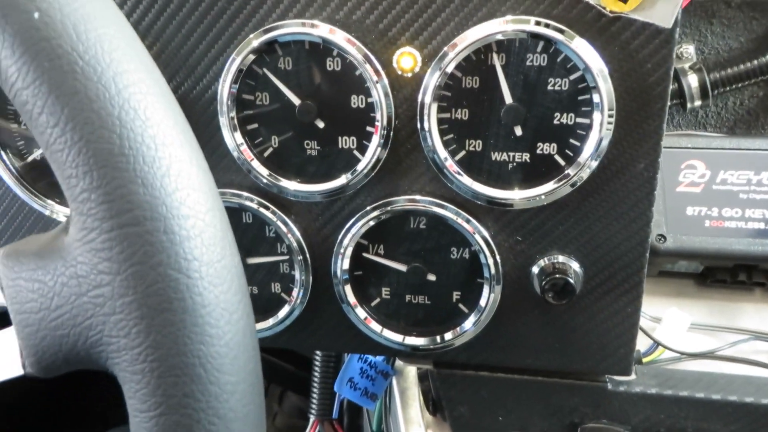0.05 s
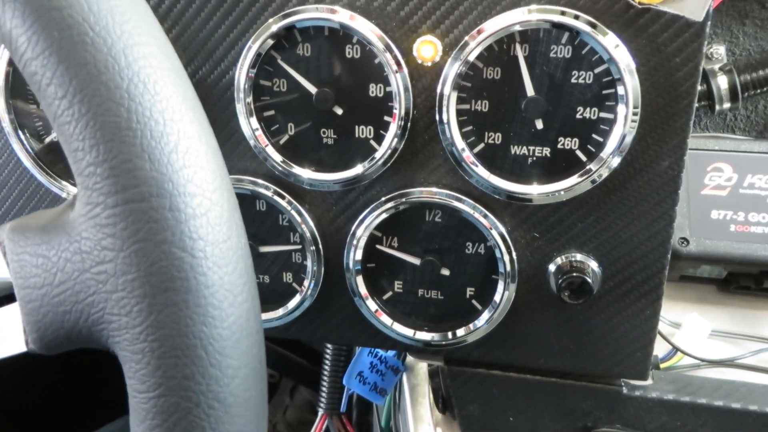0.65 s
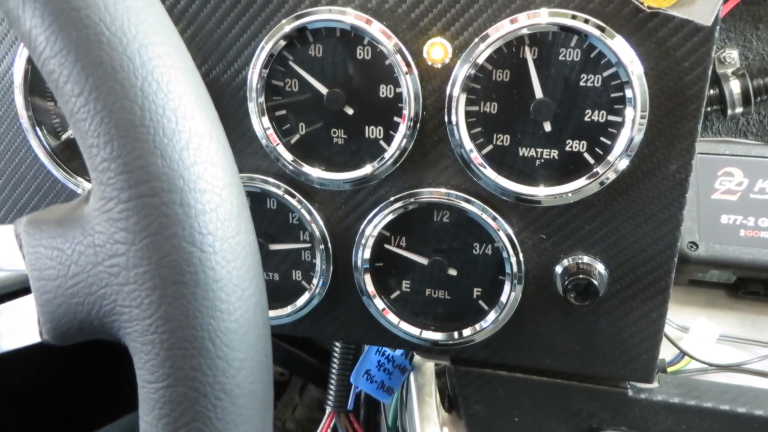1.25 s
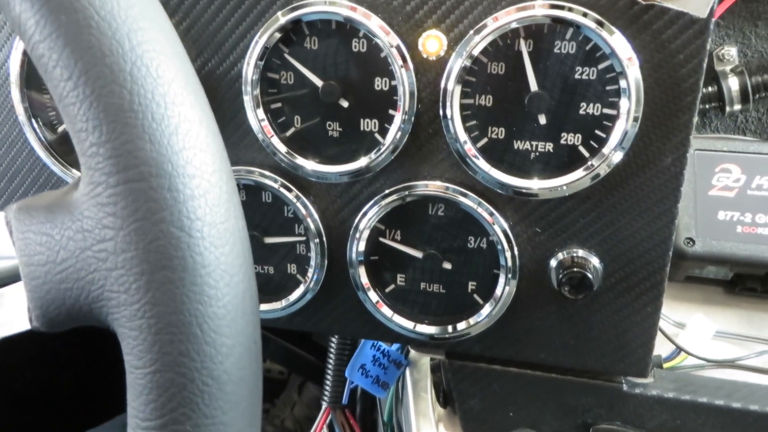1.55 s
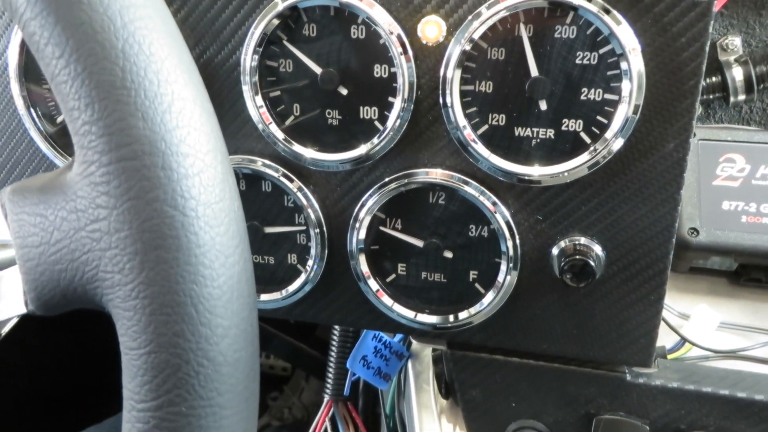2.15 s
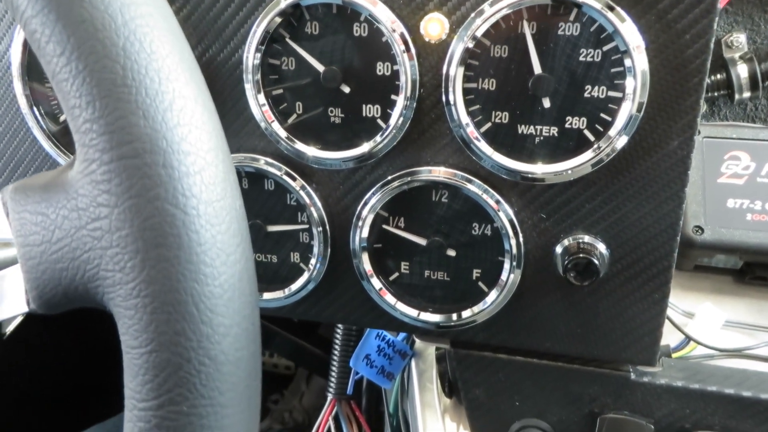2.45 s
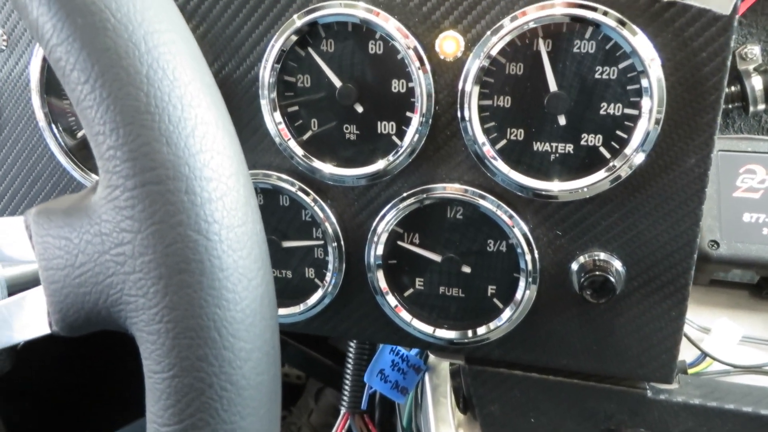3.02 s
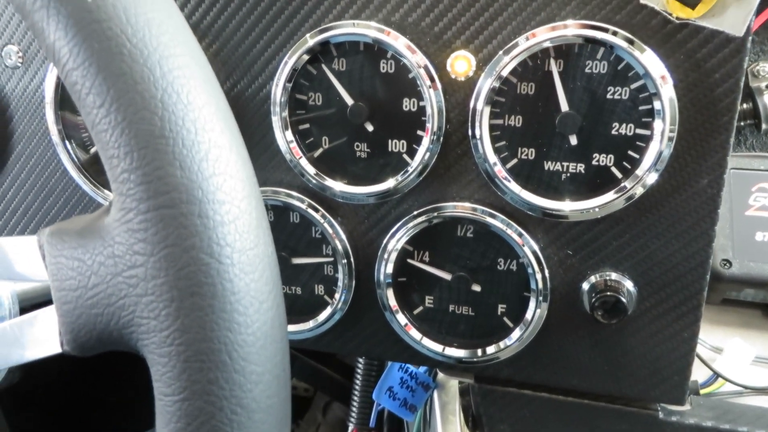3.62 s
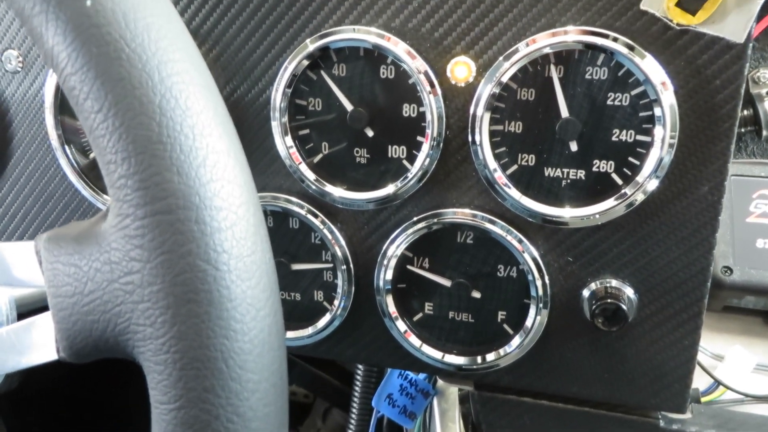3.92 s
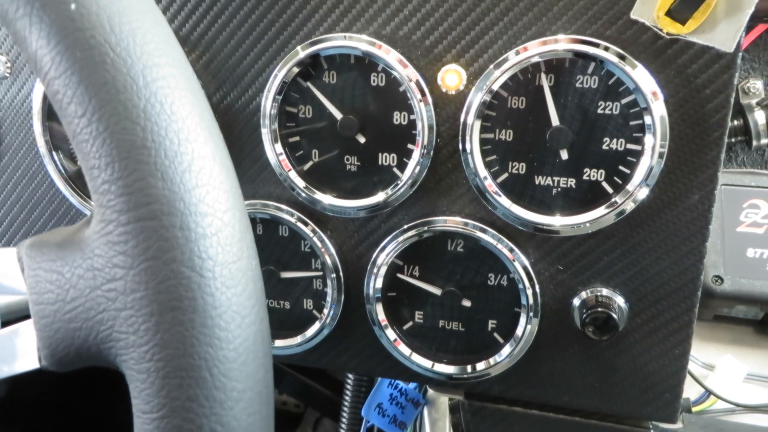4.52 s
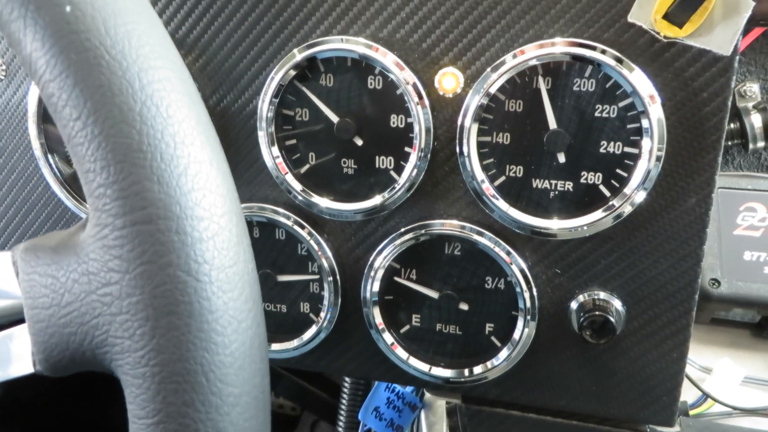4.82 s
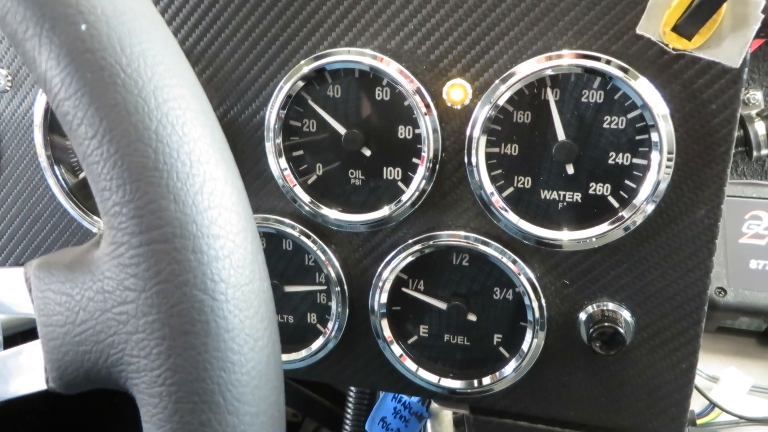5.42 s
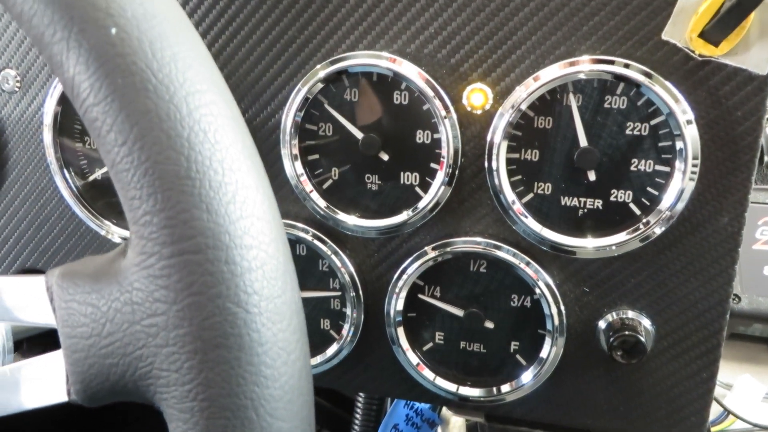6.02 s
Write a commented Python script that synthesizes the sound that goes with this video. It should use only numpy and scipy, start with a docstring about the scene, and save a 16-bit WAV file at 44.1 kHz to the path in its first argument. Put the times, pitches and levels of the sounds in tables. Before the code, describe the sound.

A V8 car engine idles in a garage with a low, lumpy burble, a steady fan whine and engine bay hiss. One sharp throttle blip brings a fizz of intake air, small metal rattles, exhaust barks and a buzzing loose panel. The revs are then held a little above idle while the cabin booms, before sinking back to the uneven idle. The microphone is inside, at the driver's seat.

```python
"""In a garage, heard from the driver's seat, a V8 idles with a lumpy burble.
The throttle is blipped, then held while the cabin booms, and the engine sinks back to idle.
Periodic firings give a harmonic hum; their inequality excites the resonances of pipe and cabin.
A fan whines and panels drone in the hiss of the engine bay; all sink away while the exhaust is loud.
The blip brings a fizz of intake air, metal rattles, exhaust barks and the buzz of a loose panel."""
import sys
import numpy as np
from scipy import signal
from scipy.fft import rfft, irfft
from scipy.io import wavfile
from scipy.ndimage import uniform_filter1d, minimum_filter1d

SR = 44100
rng = np.random.default_rng(int(sys.argv[2]) if len(sys.argv) > 2 else 0)


def to_wav(s):
    """Save 16-bit WAV."""
    ch = np.atleast_2d(s).T  # columns
    pcm = np.round(np.clip(ch, -1, 1) * 32767)  # PCM
    wavfile.write(sys.argv[1], SR, pcm.astype(np.int16))


N = 276066
TIME = np.arange(N) / SR


def amp(db):
    """Amplitude ratio of a level in decibels."""
    return 10 ** (np.asarray(db) / 20)


def unit(x):
    """Normalisation to rms 1."""
    return x / np.sqrt(np.mean(x ** 2) + 1e-20)


def by_time(rows):
    """Linear interpolation of a time table at every sample."""
    return np.interp(TIME, *np.transpose(rows))


def by_frequency(rows, hz):
    """Interpolation of a spectrum on a logarithmic frequency axis."""
    f, value = np.transpose(rows)
    return np.interp(np.log(hz + 1), np.log(f), value)


def colour(x, spectrum):
    """Minimum-phase filtering: the phase is the Hilbert transform of the log gain."""
    hz = abs(np.fft.fftfreq(2 ** 14, 1 / SR))
    log_gain = np.log(amp(by_frequency(spectrum, hz)))
    response = np.exp(signal.hilbert(log_gain).conj())
    taps = np.fft.ifft(response).real[:2 ** 13]
    return signal.oaconvolve(x, taps)[:N]


def resonate(x, hz, width):
    """Second-order resonance of peak gain 1 and Q = hz / width."""
    return signal.lfilter(*signal.iirpeak(hz, hz / width, SR), x)


def wander(hz):
    """Random modulation: low-pass Gaussian noise of rms 1."""
    lowpass = np.exp(-(np.fft.rfftfreq(N, 1 / SR) / hz) ** 2)
    return unit(irfft(rfft(rng.standard_normal(N)) * lowpass, N))


def puffs(cycles, length):
    """Exponential relaxation restarted each cycle; length is its time constant in cycles."""
    return unit(np.exp(-(cycles % 1) / length))


def swell(start, end, rise, fall):
    """Exponential growth up to start, a plateau until end, then exponential decay."""
    return np.exp(np.minimum(TIME - start, 0) / rise - np.maximum(TIME - end, 0) / fall)


def stroke(start, end, db, sag, rise, fall):
    """A swell whose plateau decays by sag decibels a second."""
    return amp(db - sag * np.clip(TIME - start, 0, end - start)) * swell(start, end, rise, fall)


# engine speed as firing rate: t/s, f/Hz
FIRING_RATE = [(0.0, 58.99), (0.45, 54.76), (1.27, 48.57), (1.75, 47.57), (2.0, 50.01), (2.2, 50.66),
               (2.43, 77.22), (2.6, 100.93), (2.82, 99.73), (2.95, 87.14), (3.17, 71.7), (3.37, 74.44),
               (3.95, 74.17), (4.16, 57.68), (4.31, 60.0), (5.54, 51.97), (5.84, 47.34), (6.26, 48.52)]

def firing_count():
    """Phase is the integral of frequency: firings so far, four to a crankshaft turn."""
    return np.cumsum(by_time(FIRING_RATE)) / SR


def by_speed(rows, column=1):
    """Interpolation of a table at the instantaneous firing rate."""
    columns = np.transpose(rows)
    return np.interp(by_time(FIRING_RATE), columns[0], columns[column])


# cylinders in firing order: bank (+1 near, -1 far), relative level/dB
FIRING_ORDER = [(1, 5.5), (-1, 13), (1, 2.5), (1, 6), (-1, 4), (1, 2.5), (-1, 5), (-1, 10.5)]

def firing_pulses(firings, bank_share, rough):
    """Two impulse trains: one weighted by cylinder, bank and chance, one uniform."""
    at = np.flatnonzero(np.diff(np.floor(firings)) > 0)
    bank, db = np.transpose(FIRING_ORDER)[:, np.arange(len(at)) % len(FIRING_ORDER)]
    size = amp(db) * (1 + bank_share * np.sign(bank))
    uneven, even = np.zeros((2, N))
    uneven[at] = size / size.mean() + rough * rng.standard_normal(len(at))
    even[at] = 1
    return uneven, even


# round trips between floor, body and garage walls: delay/s, reflection coefficient (capped below)
ROUND_TRIPS = [(.0047, 1), (0.011, 1), (0.0194, 0.33)]

def scatter(x):
    """Multiple reflection as all-pass filtering: pulses spread in time without being coloured."""
    spectrum, hz = rfft(x, 2 * N), np.fft.rfftfreq(2 * N, 1 / SR)
    for delay, reflection in ROUND_TRIPS:
        trip = np.exp(-2j * np.pi * hz * delay)
        reflection = np.clip(reflection, 0, .8)
        spectrum = spectrum * (reflection + trip) / (1 + reflection * trip)
    return irfft(spectrum)[:N]


# envelope of the limping exhaust beat: t/s, level/dB
BURBLE_LEVEL = [(0, -23.5), (.4, -16), (1.15, -19), (2.1, -21), (2.27, -10), (2.33, -14.5), (2.5, -15.5),
                (2.85, -12.5), (2.98, -20), (3.32, -19.5), (3.65, -28), (3.95, -23.5), (4.15, -22.5),
                (4.35, -16.5), (5.0, -12), (5.38, -22.5), (6.26, -24.5)]
# response of the exhaust pipe, heard in the cabin: f/Hz, gain/dB
PIPE_RESPONSE = [(20, -86.5), (33, -49), (44, -7.5), (68, -17), (95, -13), (135, -3.5), (175, -7),
                 (200, -11.5), (230, -11.5), (270, -17.5), (295, -29.5), (400, -28.5), (500, -35.5),
                 (1500, -78)]
# air modes of the cabin: f/Hz, bandwidth/Hz, gain/dB
CABIN_MODES = [(134, 6.2, 0), (148.55, 7.1, 11.5), (169, 8.2, 6.5), (206, 7.8, 2), (221, 10, 2.5),
               (269.1, 11.2, 7.5), (331.5, 10, 6)]

def burble(firings, even_share=0.11, gas_db=-19, bite=0.33, bite_hz=240, neutral_load_db=-42):
    """Subharmonic excitation: unequal firings repeat every eight pulses and ring pipe and cabin."""
    uneven, even = firing_pulses(firings, bank_share=.75, rough=.17)
    limp = unit(uneven - (1 - even_share) * even)
    gas = puffs(firings, length=0.94) * rng.standard_normal(N)
    pipe = colour(scatter(limp + amp(gas_db) * gas), PIPE_RESPONSE)
    # load sharpens the pulses, which lifts their upper partials
    load_gain, _ = load()
    upper = signal.sosfiltfilt(signal.butter(4, bite_hz, "high", fs=SR, output="sos"), pipe)
    pipe = pipe + upper * ((load_gain / amp(neutral_load_db)) ** bite - 1)
    cabin = pipe + sum(amp(db) * resonate(pipe, hz, width) for hz, width, db in CABIN_MODES)
    # the envelope alone sets the level, whichever mode the pulses hit
    running_rms = np.sqrt(uniform_filter1d(cabin ** 2, size=2800) + 1e-12)
    return amp(by_time(BURBLE_LEVEL) - 0.08) * cabin / running_rms


# envelope of the firing fundamental: t/s, level/dB
HUM_LEVEL = [(0, -32), (1.0, -24), (1.7, -21.5), (2.0, -25.5), (2.25, -18.5), (2.7, -19.5), (2.85, -27),
             (3.0, -22), (3.33, -23.5), (3.8, -31.5), (4.0, -47), (4.33, -27.5), (5.25, -36), (5.85, -26),
             (6.26, -28.5)]
# harmonics the cabin favours: firing f/Hz, second/dB re fundamental, third/dB re burble
HUM_OVERTONES = [(46.9, 0, -14.5), (49.4, 1, 4), (51.8, 3, -12), (59.5, 7.5, -7), (58.4, 0, -2),
                 (67, 4, -19), (75, 2, -11), (84.4, 8, -25.5), (100, -10.5, -23)]

def hum(firings, waver_db=2.5, boom_start=3.31, boom_end=3.96, boom_db=-8, boom_sag_db_per_s=9.5):
    """Harmonic series of the push all firings share; for a spell the second booms in the cabin."""
    first = by_time(HUM_LEVEL)
    second = first + by_speed(HUM_OVERTONES)
    third = by_time(BURBLE_LEVEL) + by_speed(HUM_OVERTONES, column=2)
    phase = 2 * np.pi * firings + np.pi / 2
    tones = sum(amp(db + 0.2 + waver_db * wander(hz=19.6)) * np.sin(k * phase)
                for k, db in enumerate([first, second, third], 1))
    held = swell(boom_start, boom_end, rise=0.018, fall=0.027)
    sag_db = boom_sag_db_per_s * np.maximum(TIME - boom_start, 0)
    boom = amp(boom_db - sag_db - 0.4 * wander(hz=12))
    return np.sqrt(2) * (tones + held * (boom - amp(second)) * np.sin(2 * phase))


# rasp with the throttle shut: firing f/Hz, level/dB
COASTING_RASP = [(47, -84), (53, -44.5), (60, -45.5), (100, -36.5)]
# throttle presses: start t/s, end t/s, level/dB, sag/(dB/s), roughness (0-1)
THROTTLE_PRESSES = [(2.41, 2.79, -30.5, -1, 0.46), (3.425, 3.728, -23.5, 42, 0.32),
                    (4.328, 5.218, -36.5, 1, 0.45)]

def load(coasting_roughness=0.54):
    """Superposition of coasting and throttle: the rasp's amplitude and weighted mean roughness."""
    gain = amp(by_speed(COASTING_RASP))
    rough = coasting_roughness * gain
    for start, end, db, sag, roughness in THROTTLE_PRESSES:
        press = stroke(start, end, db, sag, rise=0.092, fall=0.084)
        gain = gain + press
        rough = rough + roughness * press
    return gain, np.clip(rough / gain, 0, 1)


# spectrum of the exhaust rasp: f/Hz, relative level/dB
RASP_SPECTRUM = [(100, -53.5), (220, 8.5), (290, 2), (375, 2), (450, -0.5), (520, -5), (580, -5.5),
                 (750, -19), (1200, -21), (2500, -51.5), (6000, -51)]

def rasp(firings, gas_db=-7, direct=0.2):
    """Pulse sharpening: under load, steep pulses and bursts of gas carry higher partials."""
    uneven, even = firing_pulses(firings, bank_share=0.44, rough=0.63)
    gain, rough = load()
    pulses = unit((1 - rough) * unit(even) + rough * unit(uneven - even))
    heard = unit(direct * pulses + (1 - direct) * scatter(pulses))
    gas = puffs(firings, length=0.1) * rng.standard_normal(N)
    return gain * unit(colour(heard + amp(gas_db) * gas, RASP_SPECTRUM))


# likeness of the noise at left and right: f/Hz, coherence
COHERENCE = [(50, .9995), (300, .96), (700, .88), (2500, .89), (4500, .72), (7000, .4), (9000, .25),
             (12500, .4)]
# phase of the left channel relative to the right: f/Hz, phase/rad
PHASE_LEAD = [(3000, 0), (5500, -.2), (8000, -.8), (10000, -2.4), (13000, -3.0)]

def stereo_noise(spectrum):
    """Partial coherence: noise at two points grows less alike as the wavelength shortens."""
    hz = np.fft.rfftfreq(N, 1 / SR)
    coherence = np.clip(by_frequency(COHERENCE, hz), -1, 1)
    shift = np.exp(-1j * by_frequency(PHASE_LEAD, hz))
    left, independent = rfft(rng.standard_normal((2, N))) * amp(by_frequency(spectrum, hz))
    right = coherence * left * shift + np.sqrt(1 - coherence ** 2) * independent
    pair = irfft(np.array([left, right]), N)
    return pair / np.std(pair.mean(0))


# common envelope of hiss, drone and whine: t/s, level/dB
BAY_LEVEL = [(0, -36.5), (1.15, -35), (2.13, -31.5), (2.27, -34.5), (2.33, -44), (2.85, -46.5), (3.3, -44),
             (3.5, -48.5), (3.87, -48.5), (4.37, -39.5), (5.13, -39), (6.26, -34.5)]
# spectral density of the hiss: f/Hz, relative level/dB
HISS_SPECTRUM = [(30, -34.5), (200, 16.5), (350, -7.5), (490, -6), (620, 0), (1000, -1.5), (1500, -0.5),
                 (2200, -2.5), (2800, -4.5), (3500, -5), (4400, -5.5), (5200, -9), (8000, -13.5),
                 (12000, -20.5), (14000, -45)]
# modes of panels and ducts: f/Hz, bandwidth/Hz, relative level/dB
PANEL_MODES = [(400.2, 10.5, -7.5), (376.5, 18.4, -9), (760, 23.3, -0.5), (808.5, 50, -3.5),
               (1147, 29, -6.5), (1206.5, 28, -8), (3350, 190, -11.5)]

def engine_bay(firings, hiss_db=7.5, drone_db=-1.23, whine_db=-3.5, pulsing=0.03, throb=0.08):
    """Broadband excitation: belts, valves and air hiss; airflow drives panel modes; the fan whines."""
    hiss = stereo_noise(HISS_SPECTRUM) * (1 - pulsing + pulsing * puffs(firings, length=0.52))
    hiss = hiss * amp(hiss_db + 0.47 * wander(hz=60)) * amp([[.2], [-.2]])
    air = rng.standard_normal(N)
    drone = sum(amp(db) * unit(resonate(resonate(air, hz, width), hz, width * 2))
                for hz, width, db in PANEL_MODES)
    drone = drone * (1 + throb * np.sin(np.pi * firings / 2))  # shaken once a crankshaft turn
    drone = drone * amp(drone_db + 1.3 * wander(hz=4)) * amp([[-1.1], [1.1]])
    return amp(by_time(BAY_LEVEL)) * (hiss + drone + amp(whine_db) * fan_whine())


# partials of the fan: harmonic number, relative level/dB
BLADE_HARMONICS = [(1, -12), (2, -13), (4, -6.5), (6, -17)]

def fan_whine(blade_hz=402.5, drift=0.00062, flutter_db=3.0):
    """Blade-passing tones of an electric fan, independent of engine speed."""
    passes = np.cumsum(blade_hz * (1 + drift * wander(hz=5))) / SR
    tones = sum(amp(db + flutter_db * wander(hz=23)) * np.sin(2 * np.pi * k * passes)
                for k, db in BLADE_HARMONICS)
    return np.sqrt(2) * tones


# spectral density of the first rush of air: f/Hz, relative level/dB
RUSH_SPECTRUM = [(300, 4), (800, 0), (3000, -22), (8000, -8), (12500, -7), (15500, -27)]
# spectral density of the intake fizz: f/Hz, relative level/dB
FIZZ_SPECTRUM = [(500, -25.5), (3000, -4.5), (5000, -7), (6700, 1), (8500, -1.5), (11500, -5), (14000, -25)]
# gulps of air: start t/s, end t/s, level/dB, sag/(dB/s)
AIR_GULPS = [(2.31, 2.685, -36.5, 21.5), (2.967, 3.068, -45.5, 3), (3.3, 3.375, -47.5, -1)]

def intake(flutter_db=1.5, rush_db=-37, rush_s=2.2, rush_width_s=.08):
    """Flow noise at the throttle plate: a rush as it cracks open, a bright fizz with each gulp."""
    flow = sum(stroke(*gulp, rise=0.12, fall=0.086) for gulp in AIR_GULPS)
    fizz = stereo_noise(FIZZ_SPECTRUM) * flow * amp(flutter_db * wander(hz=69))
    opening = np.exp(-((TIME - rush_s) / rush_width_s) ** 2 / 2)
    rush = stereo_noise(RUSH_SPECTRUM) * amp(rush_db) * opening
    return (fizz + rush) * amp([[.6], [-.6]])


# impacts of small metal parts: t/s, level/dB
METAL_IMPACTS = [(2.288, -27), (2.407, -23), (2.419, -28), (2.426, -28), (2.446, -25), (2.464, -30),
                 (3.304, -33)]
# their modes: f/Hz, relative level/dB, T60/s
METAL_MODES = [(5460, 0, 0.013), (6390, 3.5, 0.014), (6770, -1, 0.032), (6900, -1, 0.016), (8060, 0, 0.014)]

def rattles():
    """Damped free vibration of struck metal, each mode with a random phase in each channel."""
    out = np.zeros((2, N))
    t = TIME[:SR // 10]
    for onset, db in METAL_IMPACTS:
        ring = sum(amp(mode_db - 60 * t / t60) * np.sin(2 * np.pi * (hz * t + rng.random((2, 1))))
                   for hz, mode_db, t60 in METAL_MODES)
        start = round(onset * SR)
        out[:, start:start + len(t)] += amp(db) * ring
    return out


# single hard firings: t/s, level/dB
HARD_FIRINGS = [(2.360, -30), (2.423, -23), (2.486, -24), (2.499, -25), (2.523, -25), (2.654, -24),
                (2.707, -26), (3.364, -28), (3.471, -27)]
# spectrum of a bark: f/Hz, relative level/dB
BARK_SPECTRUM = [(150, -29.5), (300, -3), (470, 4), (560, -11.5), (750, -13), (1200, -28), (3000, -52.5)]

def barks(rise_s=0.006):
    """Transient flow noise: each hard firing throws a short puff of gas from the pipe."""
    envelope = 0
    for onset, db in HARD_FIRINGS:
        age = np.maximum(TIME - onset, 0) / rise_s
        envelope = envelope + amp(db) * age * np.exp(1 - age)
    return unit(colour(rng.standard_normal(N), BARK_SPECTRUM)) * envelope


# spells of buzzing: peak t/s, level/dB, rise/s, decay/s
BUZZ_SPELLS = [(2.95, -40.5, 0.16, 0.19), (3.301, -51.5, .12, 0.29)]
# knocks of the loose panel: t/s, level/dB
PANEL_KNOCKS = [(2.866, -22.5), (2.924, -33), (2.958, -28), (2.992, -33)]

def panel_buzz(firings, hz=1900, width_hz=700, knock_s=0.0013):
    """Forced vibration: a loose panel chatters once a crankshaft turn and knocks a few times."""
    shaking = sum(amp(db) * swell(peak, peak, rise, decay) for peak, db, rise, decay in BUZZ_SPELLS)
    envelope = shaking * unit(1 + puffs(firings / 4, length=.25))
    for onset, db in PANEL_KNOCKS:
        envelope = envelope + amp(db) * (TIME > onset) * np.exp(-abs(TIME - onset) / knock_s)
    band = resonate(resonate(rng.standard_normal(N), hz, width_hz), hz, width_hz)
    return envelope * unit(band)


# side signal relative to the exhaust: f/Hz, gain/dB
SIDE_RESPONSE = [(45, -48), (110, -35), (200, -26.5), (370, -19), (670, -12.5)]

def at_ears(exhaust):
    """Interaural difference: cabin reflections add at one ear and subtract at the other."""
    side = colour(scatter(exhaust), SIDE_RESPONSE)
    return exhaust + np.array([side, -side])


def scene():
    """Superposition of the sources; one count of firings keeps the engine's rhythms in step."""
    firings = firing_count()
    exhaust = hum(firings) + burble(firings) + rasp(firings) + barks()
    return at_ears(exhaust) + engine_bay(firings) + intake() + panel_buzz(firings) + rattles()


def record(dry, ceiling=.92, cutoff_hz=14400):
    """Peak limiting by a smoothed gain, then band limiting by a linear-phase low-pass."""
    allowed = np.minimum(1, ceiling / (abs(dry).max(0) + 1e-9))
    gain = uniform_filter1d(minimum_filter1d(allowed, size=900), size=900)
    lowpass = signal.firwin(511, cutoff_hz, window=("kaiser", 9), fs=SR)
    return signal.oaconvolve(dry * gain, lowpass[None], "same")


dry = scene()
out = record(dry)
to_wav(out)
```